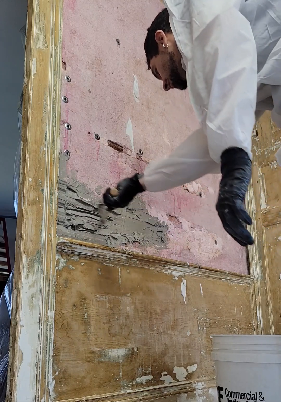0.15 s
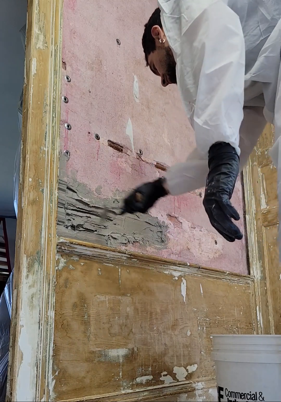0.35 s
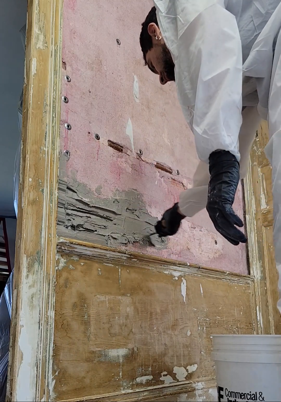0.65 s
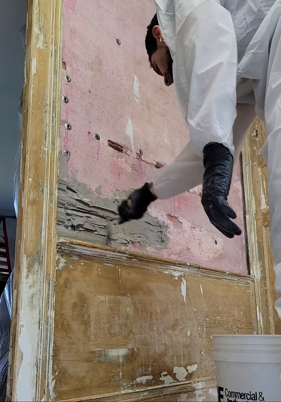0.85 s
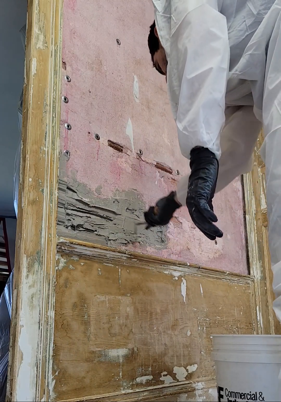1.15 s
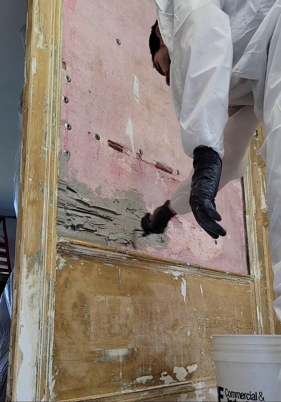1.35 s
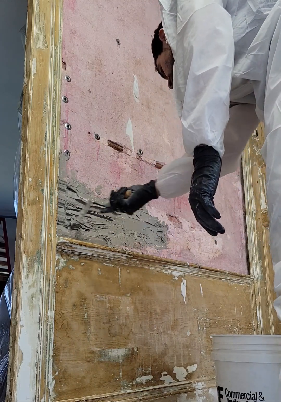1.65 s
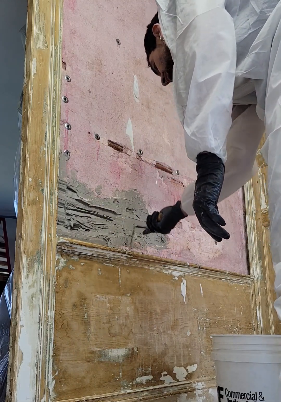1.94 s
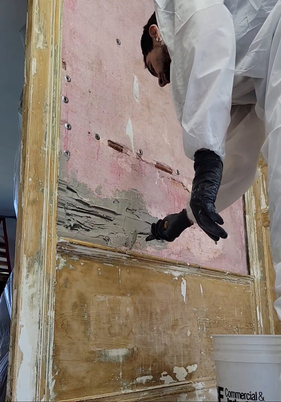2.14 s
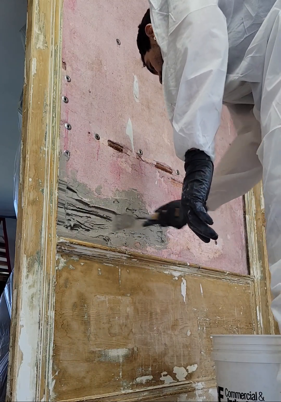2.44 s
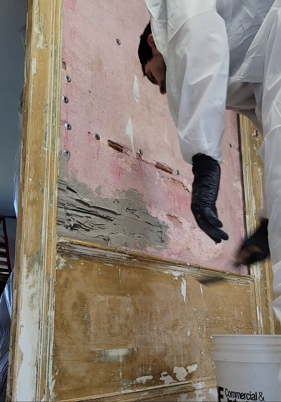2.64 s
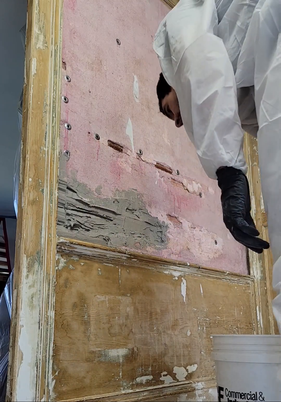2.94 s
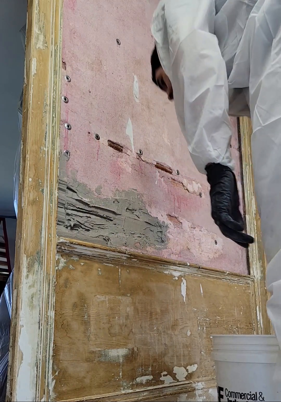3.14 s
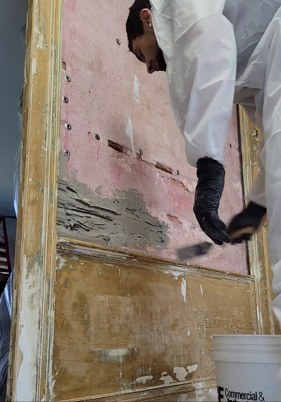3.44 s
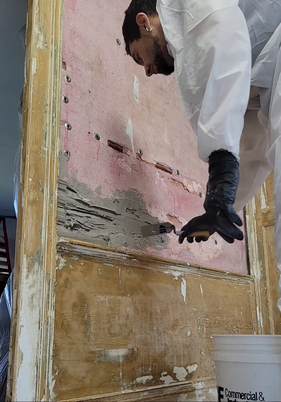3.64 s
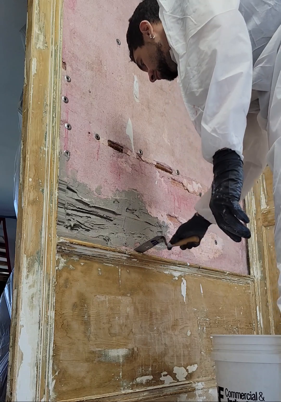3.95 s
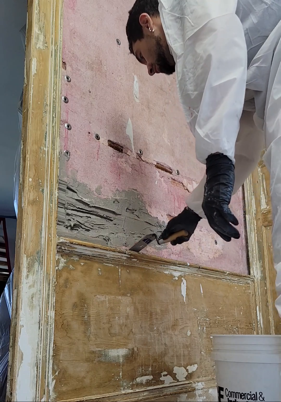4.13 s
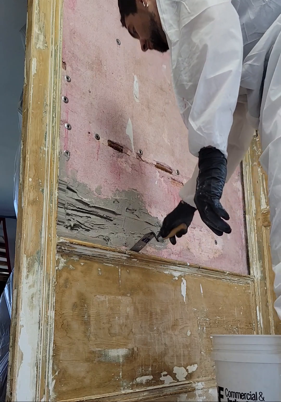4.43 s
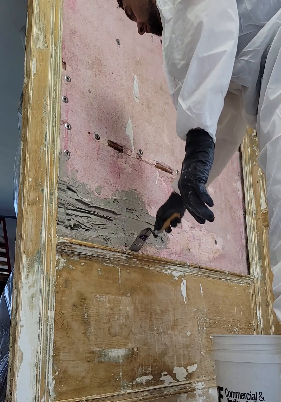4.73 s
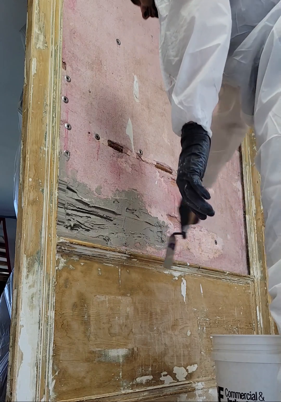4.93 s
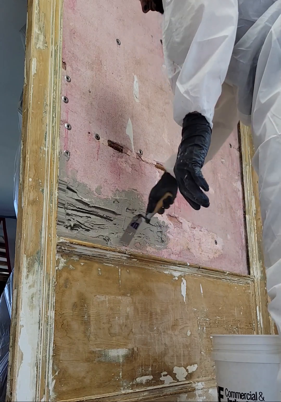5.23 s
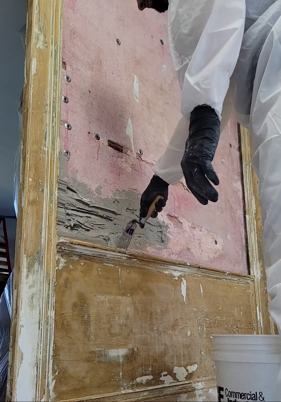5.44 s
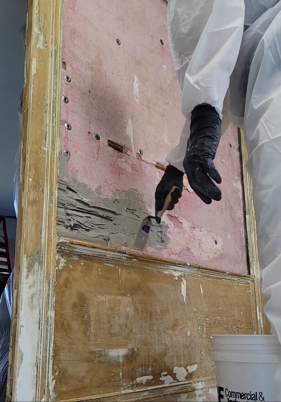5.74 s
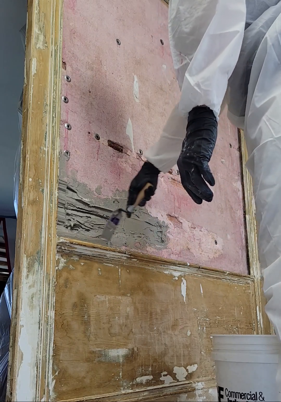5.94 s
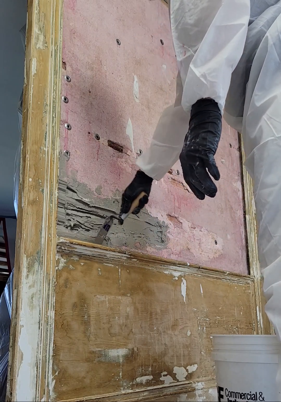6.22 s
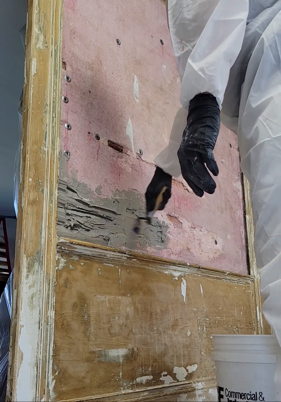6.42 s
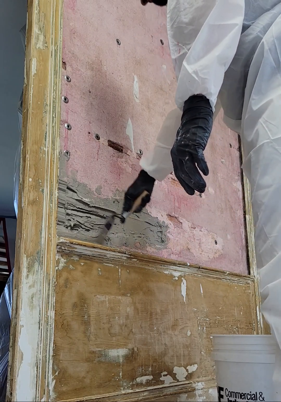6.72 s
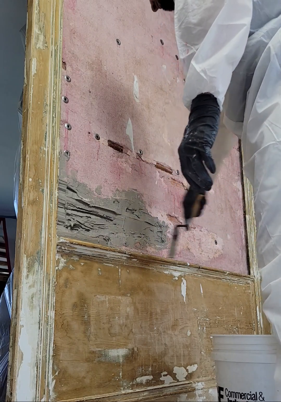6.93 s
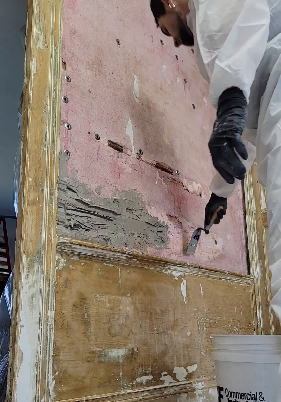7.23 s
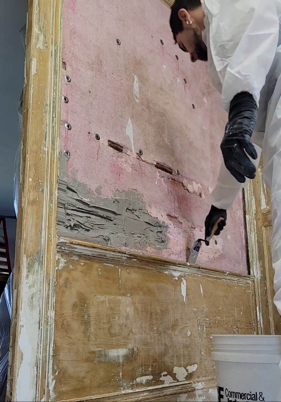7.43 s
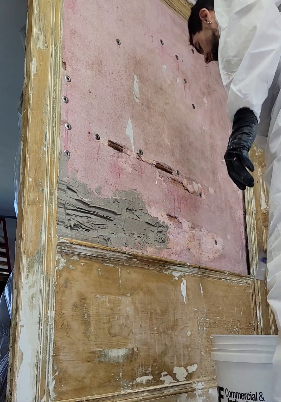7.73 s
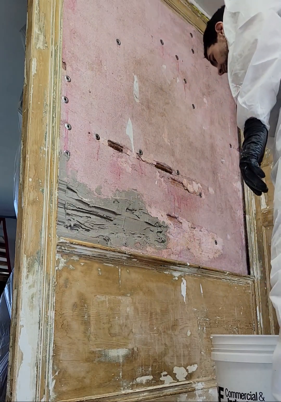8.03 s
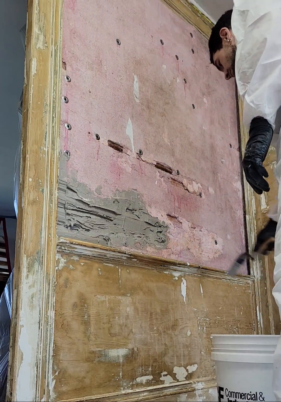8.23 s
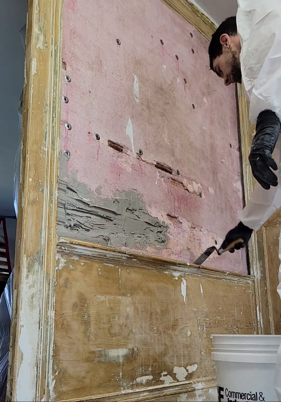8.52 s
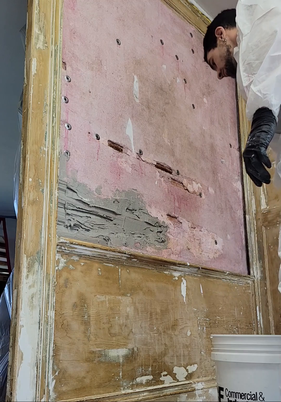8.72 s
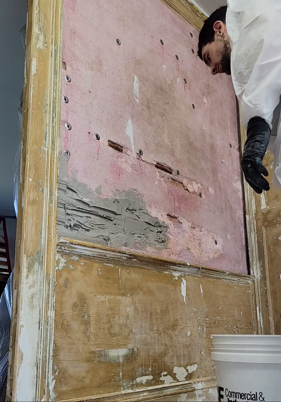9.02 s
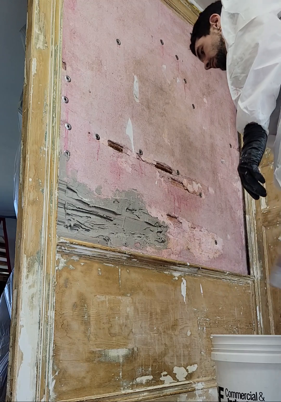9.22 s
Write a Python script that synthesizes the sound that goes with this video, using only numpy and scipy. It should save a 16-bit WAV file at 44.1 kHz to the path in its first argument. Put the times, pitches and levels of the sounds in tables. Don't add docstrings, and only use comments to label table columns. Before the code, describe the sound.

Short rasping trowel strokes, ringing metal taps and dull handling thumps on a hollow lath wall, separated by quiet hum in a reverberant empty room.

```python
import sys
import numpy as np
from scipy import signal
from scipy.io import wavfile
from scipy.ndimage import uniform_filter1d

SR = 44100
rng = np.random.default_rng(int(sys.argv[2]) if len(sys.argv) > 2 else 0)


def unload_audio(sound):
    columns = np.transpose(np.atleast_2d(sound))
    steps = np.round(np.clip(columns, -1, 1) * 32767)
    wavfile.write(sys.argv[1], SR, steps.astype(np.int16))


def to_linear_factor(level_db):
    exponent = np.asarray(level_db, float) / 20
    return 10 ** exponent


N = 413216

# pitch_hz, density_db (per Hz)
GRIT_COLOUR = [(59, -80), (100, -60), (202, -13.5), (284, -27.5), (527, -0.5), (639, -7.5), (741, -8),
               (1160, 1.5), (1440, -0.5), (1850, -3.5), (2900, -3.5), (6120, -8.5), (8420, -29.5),
               (14700, -21.5), (16300, -47.5)]
# pitch_hz, width_hz, level_db
BLADE_MODES = [(748, 100, 10.5), (980, 9.6, -2), (1410, 210, 3), (1594, 36, 6.5), (1690, 36, 8.5),
               (2063, 14, 5.5), (2889, 18, 0), (2918, 10, 6), (3030, 15, -0.5), (3860, 18, -0.5),
               (5690, 74, -3.5), (6300, 100, -1.5)]
# pitch_hz, width_hz, level_db
WALL_MODES = [(194, 160, 8.5), (212, 38, 3), (323, 34, 9.5), (390, 42, 1), (472, 120, -1.5),
              (637, 110, -1.5)]
EAR_LAG = 18


def evened(x):
    return x / np.sqrt(np.mean(x ** 2) + 1e-20)


def drift(samples):
    once = uniform_filter1d(rng.standard_normal(N), samples)
    return evened(uniform_filter1d(once, samples))


def read(points, hz):
    f, value = np.transpose(points)
    return np.interp(np.log(hz + 1), np.log(f + 1), value)


def colour(x, db_of_hz):
    gain_db = db_of_hz(abs(np.fft.fftfreq(4096, 1 / SR)))
    log_gain = np.log(to_linear_factor(np.maximum(gain_db, -90)))
    taps = np.fft.ifft(np.exp(np.conj(signal.hilbert(log_gain)))).real[:2048]
    return signal.oaconvolve(x, taps)[:len(x)]


def below(x, hz):
    return signal.sosfiltfilt(signal.butter(2, hz, fs=SR, output="sos"), x)


def above(x, hz):
    return signal.sosfilt(signal.butter(2, hz, "highpass", fs=SR, output="sos"), x)


def ring(x, hz, width):
    width = max(width, 7.5)
    pole = np.exp((-np.pi * width + 2j * np.pi * hz) / SR)
    return 2 * signal.lfilter([1 - abs(pole)], [1, -pole], x).real


def body(x, modes):
    return sum(to_linear_factor(db) * ring(x, hz, width) for hz, width, db in modes)


def pair(frame, count):
    # pitch_hz, correlation (-1 to 1)
    likeness = [(60, 0.91), (130, 1), (290, -0.43), (640, -.35), (1410, -0.74), (3100, -0.094),
                (16000, -0.61)]
    a, b, c, d = rng.standard_normal((count, frame // 2 + 1, 4)).T
    same = np.clip(read(likeness, np.fft.rfftfreq(frame, 1 / SR)), -.99, .99)[:, None]
    left = a + 1j * b
    right = same * left + np.sqrt(1 - same ** 2) * (c + 1j * d)
    return np.array([left, right])


def quiet():
    # pitch_hz, density_db (per Hz)
    air_colour = [(25, -7.5), (70, 8.5), (150, -2), (350, -2), (800, -0.5), (2200, -9.5), (4000, -12),
                  (6300, -11.5), (8200, -32.5), (10500, -29.5), (13000, -21), (16000, -24)]
    air_db, hum_hz, hum_db = -69, 118.8, -64.5
    z = pair(1024, count=N // 256 + 5)
    patches = rng.standard_normal(z.shape[:0:-1]).T
    patches = evened(uniform_filter1d(uniform_filter1d(patches, 14, 0), 12, 1))
    z *= to_linear_factor(read(air_colour, np.fft.rfftfreq(1024, 1 / SR))[:, None] + 0.5 * patches)
    air = signal.istft(z, nperseg=1024, noverlap=768)[1][:, :N]
    level = np.sqrt(2) * to_linear_factor(hum_db + 0.8 * drift(3000))
    hum = level * np.sin(2 * np.pi * hum_hz * np.arange(N) / SR)
    return to_linear_factor(air_db) * evened(air) + hum


def room(x, wet_db):
    # pitch_hz, t60_s
    decay = [(100, 0.54), (260, 0.52), (700, 0.62), (1840, 0.55), (4850, 0.41), (8000, 0.38), (12000, 0.31),
             (16000, 0.25)]
    # delay_s, level_db
    near_walls = [(.0031, -10), (.0072, -9), (.0105, -11), (.0163, -11), (.023, -12)]
    t, hz = np.arange(260) * 128 / SR, np.fft.rfftfreq(512, 1 / SR)
    fade = to_linear_factor(-60 * t / read(decay, hz)[:, None])
    z = pair(512, count=780)
    out = np.array([x, 0.85 * np.roll(x, EAR_LAG)])
    for k in range(3):
        fresh = z[:, :, 260 * k:260 * (k + 1)]
        tail = signal.istft(fresh * fade, nperseg=512, noverlap=384)[1]
        tail *= np.clip(np.arange(tail.shape[1]) / SR / 0.0041 - 0.3, 0, 1)
        tail *= to_linear_factor(wet_db) / np.linalg.norm(tail[0])
        scatter = rng.uniform(-0.91, 1, (len(near_walls), 3))
        for (s, db), (shift, skew, sign) in zip(near_walls, scatter):
            at = s * SR + 30 * shift
            tail[[0, 1], [round(at), round(at + 20 * skew)]] += to_linear_factor(db) * np.sign(sign)
        turn = np.sqrt(2 / 3) * np.cos(2 * np.pi * (3.3 * np.arange(N) / SR + k / 3))
        out += signal.oaconvolve((x * turn)[None], tail, axes=1)[:, :N]
    return out * to_linear_factor(-6.5)


def contacts():
    # start_s, tick_db, tick_hz, boom_db (floor)
    taps = [(0.0765, -13, 3380, -70), (0.163, -21.5, 2960, -70), (0.6736, -22.5, 1550, -77),
            (1.2935, -37.5, 1490, -69), (1.3546, -37, 4556, -72), (1.3998, -10, 1480, -85),
            (2.2616, -38, 830, -81.5), (2.2926, -19, 768, -69.5), (4.4467, -36, 1723, -54.5),
            (4.665, -54, 1540, -66), (4.811, -41, 872, -93.5), (4.8666, -41.5, 3180, -62),
            (4.881, -27, 2190, -58), (4.9178, -11, 2970, -52.5), (5.5901, -20, 770, -72),
            (5.6248, -14, 1360, -67), (5.6459, -8.5, 1470, -55), (5.974, -37.5, 6150, -76),
            (6.1809, -35, 2160, -67), (6.3727, -10.5, 980, -55), (6.8712, -10.5, 1430, -61),
            (7.865, -40.5, 1725, -69), (7.963, -35, 1500, -100), (8.2334, -39, 850, -68.5),
            (8.4171, -39, 2680, -62.5), (8.6054, -21.5, 2950, -56), (8.855, -39, 2620, -76),
            (9.0243, -43.5, 2320, -82), (9.193, -41, 1190, -71), (9.2211, -31.5, 1030, -71.5)]
    # start_s, tick_db, thud_db, thud_hz, boom_db (floor)
    blows = [(2.852, -4, -12.5, 241, -34), (2.863, -17.5, -27.5, 335.6, -48.5),
             (3.12, -18, -25.5, 233, -46), (3.1478, -44, -28.5, 198, -31), (4.0091, -56, -64.5, 307, -67),
             (4.2157, -46, -43, 334, -82.5), (4.4561, -18, -31, 252, -44.5), (5.434, -59, -35, 290, -65),
             (6.7757, -24.5, -39, 304, -56), (7.431, -29, -27.5, 303, -70), (7.4636, -11, -23.5, 307, -62),
             (7.565, -12, -37, 274, -56.5), (8.545, -46, -38.5, 272, -65)]
    edge = [(s, db, hz, db - 25.5, 290, boom_db) for s, db, hz, boom_db in taps]
    blunt = [(s, db, 3.64 * hz, thud_db, hz, boom_db) for s, db, thud_db, hz, boom_db in blows]
    return edge + blunt


def knocks():
    # pitch_hz, width_hz, level_db
    floor_modes = [(60.4, 8, -1.5), (83.4, 11, 2), (118, 26, -2)]
    tick, thud, boom = np.zeros((3, N + 4000))
    t = np.arange(4000) / SR
    for s, tick_db, tick_hz, thud_db, thud_hz, boom_db in contacts():
        at = round(s * SR)
        noise = rng.standard_normal(4000)
        crack = noise * np.exp(-t / 0.0021) * np.minimum(t / 0.0032, 1)
        dry_tick = 0.36 * ring(crack, tick_hz, 2.0 * tick_hz)
        ringing_tick = 2.1 * ring(crack, tick_hz, 0.22 * tick_hz)
        tick[at:at + 4000] += to_linear_factor(tick_db) * (dry_tick + ringing_tick)
        push = noise[::-1] * t / 0.0058 * np.exp(-t / 0.005)
        rough = 3.93 * ring(ring(push, thud_hz, 0.5 * thud_hz), thud_hz, 2.4 * thud_hz)
        smooth = np.sin(2 * np.pi * thud_hz * t) * t / 0.0052 * np.exp(-t / 0.002)
        thud[at:at + 4000] += to_linear_factor(thud_db) * (smooth + rough)
        boom[at + 200] += to_linear_factor(boom_db)
    tick = colour(tick, lambda hz: read(GRIT_COLOUR, hz))
    tick = tick + 0.41 * body(tick, BLADE_MODES)
    thud = above(thud + 1.1 * body(thud, WALL_MODES), 150)
    boom = body(body(boom, floor_modes), floor_modes) * SR / (2 * np.pi * 4.5)
    return to_linear_factor(14) * tick[:N], to_linear_factor(9) * thud[:N], to_linear_factor(3.5) * boom[:N]


def touch(drive, kind, start, swell, land_db, top_db, flat_db):
    lift, wall_db, plaster_db, sharp_db, drumming = kind
    t = np.arange(0, swell + 45 / lift, 1 / SR)[:drive.shape[1] - round(start * SR)]
    after = np.maximum(t - swell, 0)
    climb = np.minimum(t / swell, 1) ** 0.57
    level_db = land_db + (top_db - land_db) * climb - lift * after
    dulling_db = 3.5 * np.minimum(after / 0.044, 1)
    shares_db = (0, wall_db + drumming * flat_db, plaster_db + flat_db,
                 sharp_db + 0.13 * flat_db - dulling_db)
    on = np.clip(t / 0.00091, 0, 1) * np.clip((t[-1] - t) / 0.014, 0, 1)
    return round(start * SR), on * to_linear_factor([level_db + share for share in shares_db])


def hand():
    # start_s, swell_s, landing_db, top_pressure_db, flatness_db
    strokes = [(0.0, 0.076, -35, -44.5, 7), (0.074, 0.073, -36.5, -30, 3.5), (0.17, 0.092, -37, -38.5, 6.5),
               (0.672, 0.091, -47, -25, 10.5), (0.765, 0.1, -28.5, -13.5, 0), (1.33, 0.076, -72.5, -36, 11),
               (1.398, 0.0078, -16.5, -26.5, -4), (1.43, 0.074, -34.5, -22, 2.5),
               (4.86, 0.046, -50, -20.5, 3.5), (7.5, 0.063, -41, -29.5, 3), (8.57, 0.033, -52, -29.5, 5.5)]
    corners = [
        (5.588, 0.074, -52, -30, -2),
        (6.27, 0.14, -66.5, -32, 0.5),
        (6.79, 0.029, -63, -33, -6),
        (6.84, 0.039, -43.5, -32.5, -1.5),
    ]
    drags = [(2.26, 0.045, -55.5, -59.5, 15), (2.7, 0.18, -99, -54, 4.5), (2.856, 0.049, -33.5, -42.5, 2),
             (2.96, 0.28, -44, -44, -8.5), (3.12, 0.025, -19.5, -48, 4.5), (4.0, 0.038, -77, -71.5, -5),
             (4.215, 0.041, -77, -95, -13), (4.447, 0.027, -21, -50.5, 5.5),
             (5.432, 0.014, -48, -76.5, 16.5), (6.18, 0.014, -35, -54.5, -11.5),
             (6.715, 0.05, -54, -56.5, 2), (7.432, 0.096, -57.5, -61, 17.5)]
    brushes = [(2.48, 0.15, -87.5, -79, 18), (3.44, 0.12, -85, -75.5, -7), (3.6, 0.087, -81, -82.5, -12),
               (4.0, 0.028, -75.5, -71.5, 9), (4.655, .02, -62, -68, -15),
               (5.97, 0.0059, -33, -54.5, -17.5), (7.858, 0.039, -59, -60, 7), (7.95, 0.026, -74, -48, 0),
               (8.21, 0.039, -65, -57, 8.5), (8.3, 0.094, -67, -60, -10), (8.41, .02, -50, -63.5, -13),
               (8.7, 0.12, -57, -55.5, 2.5), (8.85, 0.014, -48, -65.5, -20),
               (9.02, 0.073, -77.5, -78, 16.5), (9.15, 0.13, -67.5, -63.5, 3)]
    # lift_db_per_s, wall_db, plaster_db, sharp_db, drumming (wall dB per flatness dB)
    firm = (448.5, -5.5, -3.5, -9.5, 0.55)
    crumbly = (413.5, -5, 10.5, -1, -0.44)
    resting = (254, 8, 7, -10.5, 0.39)
    light = (107.5, -3, 3, 2, 0.5)
    drive = np.zeros((4, N))
    for rows, kind in ((strokes, firm), (corners, crumbly), (drags, resting), (brushes, light)):
        for row in rows:
            at, part = touch(drive, kind, *row)
            drive[:, at:at + part.shape[1]] += part
    return drive


def sand(per_s, spread_db):
    size = to_linear_factor(spread_db * np.minimum(rng.exponential(1, N), 3.9)) * rng.choice([-1., 1.], N)
    return evened(size * (rng.random(N) < per_s / SR))


def scrape():
    pressure, hollow, plaster, sharp = hand()
    judder = to_linear_factor(3.5 * drift(250))
    grit = colour(sand(1800, 3.6) * judder, lambda hz: read(GRIT_COLOUR, hz))
    dull = below(grit, 4800)
    deep = below(dull, 1950)
    wall = above(body(sand(650, 2.4) * judder, WALL_MODES), 140)
    edge = to_linear_factor(-4) * pressure * evened(dull - deep)
    edge += to_linear_factor(0.5) * sharp * evened(grit - dull)
    edge += to_linear_factor(-7.5) * plaster * evened(deep)
    bite = np.tanh((pressure + plaster) / to_linear_factor(-39.5))
    steel = body(bite * edge, BLADE_MODES)
    return edge + steel + to_linear_factor(-6) * hollow * evened(wall)


def scene():
    tick, thud, boom = knocks()
    far = room(scrape() + to_linear_factor(-1) * tick + thud, wet_db=3.9)
    near_tick = to_linear_factor(-6) * np.array([tick, np.roll(tick, EAR_LAG)])
    return far + near_tick + to_linear_factor(-19) * thud + boom + quiet()


def band_limit(x):
    return signal.sosfilt(signal.butter(12, 16640, fs=SR, output="sos"), x)


def record(dry):
    # pitch_hz, left_minus_right_db
    balance = [(60, 3.5), (100, -1.5), (180, -4.5), (310, -3), (550, 1), (950, -2), (1650, -1), (2860, 0.0),
               (4970, -5), (8640, 4), (15000, -1)]
    # pitch_hz, side_gain_db
    narrowing = [(40, -15), (150, -5.5), (300, -1), (600, -1), (1200, -3), (2200, -1), (16000, -3.5)]
    left = colour(dry[0], lambda hz: 0.5 * read(balance, hz))
    right = colour(dry[1], lambda hz: -0.5 * read(balance, hz))
    lift = to_linear_factor(read(narrowing, np.fft.rfftfreq(512, 1 / SR)))[:, None]
    side = signal.istft(signal.stft(left - right, nperseg=512)[2] * lift)[1][:N]
    ports = np.array([left + right + side, left + right - side]) / 2
    ports = above(ports, 45)
    treble_cut = signal.firwin(511, 15850, window=("kaiser", 9), fs=SR)
    ports = signal.oaconvolve(ports, treble_cut[None], "same", 1)
    power = uniform_filter1d((ports ** 2).mean(0), 2000)
    power_db = 10 * np.log10(abs(power) + 1e-12)
    over_db = 0.21 * np.maximum(power_db + 13.5, 0)
    creep = np.arange(N) * 2.3 / SR
    cut_db = np.maximum.accumulate(over_db + creep) - creep
    mix = ports / to_linear_factor(uniform_filter1d(cut_db, 400))
    return band_limit(mix)


dry = scene()
out = record(dry)
unload_audio(out)
```